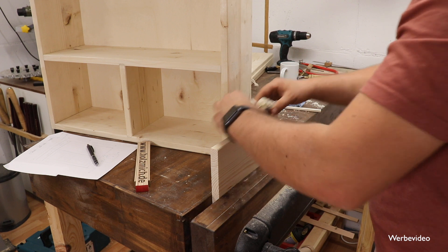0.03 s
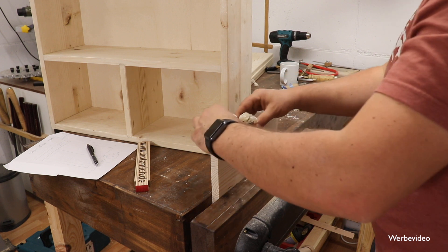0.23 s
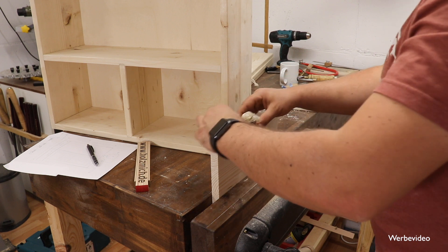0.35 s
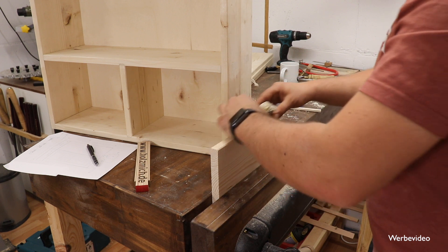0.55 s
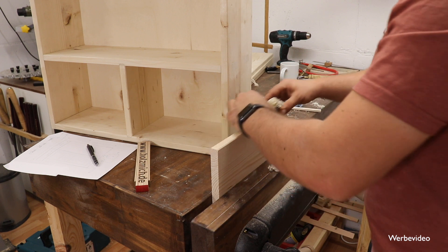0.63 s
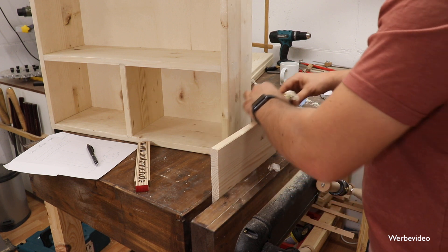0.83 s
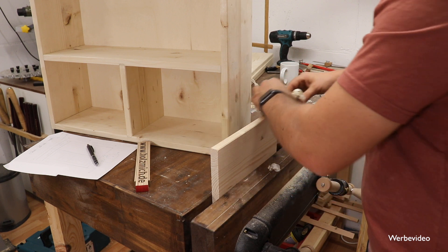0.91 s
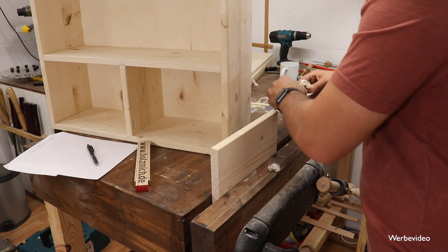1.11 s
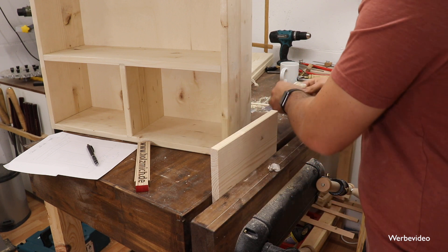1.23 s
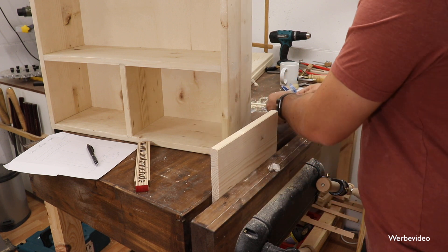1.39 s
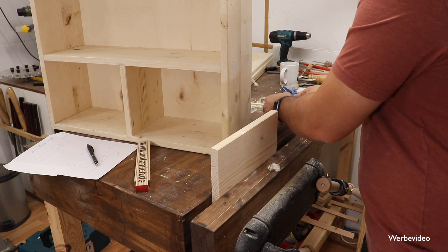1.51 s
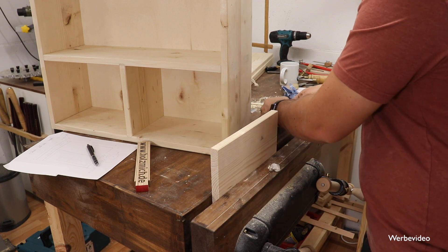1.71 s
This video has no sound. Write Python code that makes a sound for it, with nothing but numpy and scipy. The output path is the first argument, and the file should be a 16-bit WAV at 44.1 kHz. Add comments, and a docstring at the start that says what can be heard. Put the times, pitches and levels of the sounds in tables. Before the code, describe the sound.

A hand plane knocks onto a pine board and rasps off one long shaving in a workshop

```python
"""Hand plane on a pine board

Place: a small, quiet workshop, one microphone close to the board clamped to the bench. The plane slides back,
knocks down and chatters, takes one long shaving and lifts off, then touches down again with a few ticks.
Torn-fibre noise is coloured by board and blade; soft blows ring the board's modes; slides are shaped noise;
ticks and thuds are short sines. A decaying noise tail is the room, and steady noise the air.
"""
import sys
import numpy as np
from scipy import signal
from scipy.fft import rfft, irfft, next_fast_len
from scipy.io import wavfile
from scipy.ndimage import map_coordinates

SR = 44100
rng = np.random.default_rng(int(sys.argv[2]) if len(sys.argv) > 2 else 0)


def int16_out(signal):
    """Quantize to a 16-bit WAV file."""
    q = np.round(np.clip(np.atleast_2d(signal).T, -1, 1) * 32767)
    wavfile.write(sys.argv[1], SR, q.astype(np.int16))


N = 77175  # 1.75 s


def amp(db):
    """Amplitude factor of a level in dB."""
    return 10 ** (np.asarray(db) / 20)


def unit(x):
    """x scaled to an RMS of one."""
    return x / np.sqrt(np.mean(x ** 2) + 1e-20)


def along(points, hz):
    """Values at hz, read between (pitch_hz, value) points on a log frequency axis."""
    point_hz, value = np.transpose(points)
    return np.interp(np.log(hz + 1), np.log(point_hz + 1), value)


def filtered(x, response):
    """x multiplied in the spectrum by a complex response of frequency."""
    size = next_fast_len(N + SR // 2)
    spectrum = rfft(x, size) * response(np.fft.rfftfreq(size, 1 / SR))
    return irfft(spectrum, size)[..., :N]


def wobble(rate):
    """A smooth random curve with `rate` random knots a second."""
    knots = rng.standard_normal(int(N * rate / SR) + 4)
    return map_coordinates(knots, [np.arange(N) * rate / SR])


def band(f, lo_hz, hi_hz, order=6):
    """A soft-edged pass band."""
    low_edge = 1 + (lo_hz / (f + 1)) ** (2 * order)
    high_edge = 1 + (f / hi_hz) ** (2 * order)
    return 1 / np.sqrt(low_edge * high_edge)


def gains(rows):
    """Per-sample gains from rows of (start_s, level_db, ..), silent outside them."""
    s, *columns = np.transpose(rows)
    t = np.arange(N) / SR
    on = np.clip(np.minimum(t - s[0], s[-1] - t) / 0.022, 0, 1)  # 22 ms fades
    return [on * amp(np.interp(t, s, levels_db)) for levels_db in columns]


# the cut as the board sounds it, low bands to high:
# start_s, body_db, hum_db, lower_rasp_db, rasp_db, upper_rasp_db
CUT_LEVELS = [(0.33, -37, -51, -51.5, -80, -60), (0.42, -50.5, -43.5, -41, -47.5, -44),
              (0.496, -42.5, -43.5, -37.5, -64, -44.5), (0.586, -46, -44.5, -42.5, -41, -42),
              (0.608, -35, -55.5, -35, -41.5, -40), (0.632, -58, -39, -38, -48, -46),
              (0.66, -38.5, -44, -36, -49, -38), (0.698, -42, -37, -36.5, -38.5, -42),
              (0.724, -43, -48, -40, -35.5, -36.5), (0.79, -75, -28.5, -34.5, -29.5, -44.5),
              (0.806, -56, -31, -42, -29.5, -40), (0.826, -36, -54, -41, -43, -49),
              (0.846, -36.5, -45, -49, -41, -39), (0.876, -51, -43.5, -51, -37, -38),
              (0.902, -50, -41.5, -46.5, -37.5, -36.5), (0.934, -45, -40.5, -46, -36, -36.5),
              (0.96, -45.5, -38, -48, -35.5, -38), (1.012, -56, -46, -61, -41, -50.5),
              (1.044, -44.5, -49.5, -36.5, -55, -40), (1.072, -49.5, -55, -53, -64, -65),
              (1.108, -57, -62, -50.5, -77, -62), (1.16, -64, -67, -61, -70, -73)]
# the shaving's hiss: start_s, lower_treble_db, treble_db, top_db
SHAVING_LEVELS = [(.34, -66, -75, -78), (.41, -50, -58, -67), (.435, -49, -52, -59), (.47, -47, -53, -61),
                  (.61, -43, -49, -56), (.67, -40, -49, -54), (.73, -39, -48, -51), (.795, -40, -45, -48),
                  (.806, -39, -41, -45), (.82, -44, -49, -56), (.87, -47, -54, -63), (.945, -43, -53, -61),
                  (1.01, -50, -63, -70), (1.045, -50, -60, -65), (1.065, -57, -66, -74),
                  (1.13, -64, -74, -80)]
BODY_TOP_HZ, HUM_TOP_HZ, SPLIT_HZ, RASP_TOP_HZ = 463, 958, 1750, 1890
TREBLE_HZ, TOP_SPLIT_HZ = 6600, 10140
UNEVEN_DB = .6  # typical swing of the rub


def cut():
    """The blade's bites shake the board and hiss off with the shaving."""
    rub = friction() * amp(UNEVEN_DB * wobble(23.55))
    parts = [  # colour, low edge, high edge: one for each level column
        (board, 170, BODY_TOP_HZ),
        (board, BODY_TOP_HZ, HUM_TOP_HZ),
        (board, HUM_TOP_HZ, SPLIT_HZ),
        (board, SPLIT_HZ, RASP_TOP_HZ),
        (rasp, RASP_TOP_HZ, 2900),
        (rasp, 2900, TREBLE_HZ),
        (hiss, TREBLE_HZ, TOP_SPLIT_HZ),
        (hiss, TOP_SPLIT_HZ, 20000)]
    total = np.zeros(N)
    for gain, (colour, lo, hi) in zip(gains(CUT_LEVELS) + gains(SHAVING_LEVELS), parts):
        total += gain * unit(filtered(rub, lambda f: colour(f) * band(f, lo, hi)))
    return total


BITES_PER_S, BITE_SPREAD_DB = 5000, 2
SMOOTH_SHARE = .7  # share of the power in the smooth rub


def friction():
    """Fibres tearing at random moments over a smooth rub."""
    torn = rng.random(N) < BITES_PER_S / SR
    bites = torn * rng.standard_normal(N) * amp(BITE_SPREAD_DB * rng.standard_normal(N))
    smooth = rng.standard_normal(N)
    return np.sqrt(SMOOTH_SHARE) * smooth + np.sqrt(1 - SMOOTH_SHARE) * unit(bites)


# what the board rings with: pitch_hz, width_hz, level_db (relative)
BOARD_MODES = [(64.3, 6.8, -49), (147.3, 24.5, -3.5), (265.2, 28.8, 0), (334, 46, -3), (401.5, 43, -3),
               (507, 48, -5.5), (581, 72, -3.5), (674.5, 91, 0.5), (768.6, 42.6, 1), (834, 50, -3.5),
               (1166, 205, -11), (1325, 34.4, -5), (1405, 35, -8.5), (1525, 137, -9.5), (1712, 150, -17),
               (2182, 250, -13)]


def board(f):
    """The board's resonant modes, summed with alternating sign."""
    total = 0
    for k, (centre, width, db) in enumerate(BOARD_MODES):
        mode = 1j * f * width / (centre * centre - f * f + 1j * f * width)
        total = total + (-1) ** k * amp(db) * mode
    return total


# the plane's own resonances: pitch_hz, width_hz, lift_db (negative is a dip)
PLANE_MODES = [(2178, 140, 4.5), (3176, 90, 5.5), (3850, 99, 2.5), (4110, 130, 3), (4400, 150, 2),
               (5150, 78, 6), (7320, 86, 5), (8000, 100, -8), (8360, 120, 3.5)]


def plane(f):
    """The plane's resonances lift or dip the colour around their pitches."""
    return amp(sum(db / (1 + (2 * (f - centre) / width) ** 2) for centre, width, db in PLANE_MODES))


# blade and plane body above the board's modes: pitch_hz, level_db (relative)
RASP_COLOUR = [(1000, -11), (1700, -4), (1950, 1), (2170, 4), (2730, -7), (3200, -9), (3650, -11.5),
               (5020, -10.5), (6680, -17.5), (7000, -17), (9100, -63), (15400, -120)]


def rasp(f):
    """Colour of blade and plane body, with the plane's resonances."""
    return amp(along(RASP_COLOUR, f)) * plane(f)


# the shaving's treble: pitch_hz, level_db (relative)
HISS_COLOUR = [(3530, -10), (6000, -3.5), (6710, -11), (7780, 1), (8700, -2.5), (10100, -10.5),
               (12700, -4.5), (14100, -7), (15600, -8.5)]


def hiss(f):
    """Colour of the shaving's hiss, with the plane's resonances."""
    return amp(along(HISS_COLOUR, f)) * plane(f)


# the sole knocks on the board: start_s, level_db (before the two offsets below), softness_hz (cut-off)
KNOCK_BLOWS = [(.210, -16, 1860), (.214, -12.5, 985), (0.22, -32, 694), (.226, -16, 880), (.234, -17, 880),
               (.239, -17, 695), (0.248, -15.5, 800), (.267, -19, 690), (0.286, -21, 890),
               (.293, -22.5, 880), (.298, -27, 700), (.765, -27.5, 1000), (0.808, -24, 600)]
KNOCK_DB, CRACK_DB = 12, -22.5  # added to each blow's level, for its push and its crack
CRACK_S = 0.036  # time for the crack to fall 60 dB


def knocks():
    """Soft blows ring the board, each with a faint woody crack."""
    push, crack = np.zeros(N), np.zeros(N)
    t = np.arange(SR // 20) / SR
    for s, db, hz in KNOCK_BLOWS:
        start = round(s * SR)
        u = 2 * np.pi * hz * t
        push[start:][:len(t)] += amp(db + KNOCK_DB) * u * np.exp(1 - u)
        fall = amp(db + CRACK_DB - 60 * t / CRACK_S)
        crack[start:][:len(t)] += fall * rng.standard_normal(len(t))
    return filtered(push, board) + filtered(crack, lambda f: band(f, 810, 4100, order=2))


# the sole slides without cutting: start_s, end_s, level_db
SLIDE_SPANS = [(-.05, 0.213, -48.5), (.215, 0.325, -56), (1.042, 1.438, -59), (1.657, 1.8, -50.5)]
# their colours, in order: back, just after landing, faint rub after the stroke, touching down again
# pitch_hz, level_db (relative)
BACK_COLOUR = [(71, -49), (120, -11), (230, -17), (286, -3), (417, -12.5), (680, 4), (785, -12), (908, -1),
               (1480, -13.5), (1680, -8), (2080, -22.5), (4210, -19), (9000, -73), (11700, -70),
               (19800, -120)]
SCUFF_COLOUR = [(1000, -21), (2200, 2), (3000, 3), (5500, -5), (9000, -16), (14000, -24)]
RUSTLE_COLOUR = [(180, -36), (300, 5), (639, -14), (701, -3), (1050, -3.5), (1260, 0.5), (2490, -7.5),
                 (12000, -17.5), (15600, -48), (22000, -120)]
TOUCH_COLOUR = [(350, -30), (600, -2), (751, -27), (834, -9), (1430, -3.5), (1740, -5.5), (3750, -9.5),
                (4060, -9), (14000, -21.5)]
SLIDE_EDGE_S = 0.005


def slides():
    """The sole rubs lightly along the edge: friction noise with an uneven level."""
    t = np.arange(N) / SR
    total = np.zeros(N)
    colours = (BACK_COLOUR, SCUFF_COLOUR, RUSTLE_COLOUR, TOUCH_COLOUR)
    for (start, end, db), colour in zip(SLIDE_SPANS, colours):
        rub = unit(filtered(friction(), lambda f: amp(along(colour, f))))
        fade = np.clip(np.minimum(t - start, end - t) / SLIDE_EDGE_S, 0, 1)
        total += fade * amp(db + wobble(30.83)) * rub
    return total


# the plane is set down: start_s, level_db (of the sine at its start), pitch_hz
TICK_CONTACTS = [(1.6608, -35, 1900), (1.666, -43, 8240), (1.6768, -35, 2200), (1.6832, -34, 1300)]
TICK_S, TICK_NOISE = .006, .3  # time to fall 60 dB; noise beside the sine


def ticks():
    """Tiny contacts as the plane is set down: fast-dying sines with some noise."""
    total, t = np.zeros(N), np.arange(SR // 50) / SR
    for s, db, hz in TICK_CONTACTS:
        ring = np.sin(2 * np.pi * hz * t) + TICK_NOISE * rng.standard_normal(len(t))
        total[round(s * SR):][:len(t)] += amp(db - 60 * t / TICK_S) * ring
    return total


# bench and board swing softly under the hands' weight: start_s, level_db (envelope peak), pitch_hz, rise_s
THUD_SWINGS = [(.23, -52, 67, .025), (.36, -53.5, 66.5, 0.034), (0.482, -62, 68, 0.026),
               (.69, -54, 69, 0.015), (.815, -52, 71, .015), (.815, -39.5, 154, 0.016),
               (.826, -32, 243.4, .011), (.89, -34.5, 243, 0.0056)]


def thuds():
    """Soft low swings that swell and die."""
    total, t = np.zeros(N), np.arange(SR // 4) / SR
    for s, db, hz, rise in THUD_SWINGS:
        swell = t / rise * np.exp(1 - t / rise)
        total[round(s * SR):][:len(t)] += amp(db) * swell * np.sin(2 * np.pi * hz * t)
    return total


# how long the small room rings: pitch_hz, t60_s
ROOM_DECAY = [(150, 0.37), (1000, 0.35), (4000, 0.34), (12000, 0.04)]
ROOM_DB = -11.5


def room(x):
    """Each frequency of the room's answer dies at its own speed; a new tail for each quarter second."""
    out, step = np.zeros(N), SR // 4
    for a in range(0, N, step):
        hz, t, z = signal.stft(rng.standard_normal(SR // 2), SR, nperseg=256)
        decay = amp(-60 * t / along(ROOM_DECAY, hz)[:, None])
        tail = signal.istft(z * decay, SR, nperseg=256)[1]
        late_tail = np.pad(tail, (300, 0))  # the answer starts about 7 ms late
        wet = signal.fftconvolve(x[a:a + step], late_tail / np.linalg.norm(tail))
        out[a:a + len(wet)] += wet[:N - a]
    return out


# the quiet workshop: pitch_hz, level_db (relative)
AIR_COLOUR = [(15, -47), (25, -17), (122, -2.5), (169, -6.5), (282, -10.5), (314, -6), (390, -10),
              (584, -6.5), (829, -10.5), (1080, -4), (1240, -11.5), (1500, -13), (15600, -24.5)]
AIR_DB = -54


def air():
    """The workshop's steady background: coloured noise at one level."""
    noise = filtered(rng.standard_normal(N), lambda f: amp(along(AIR_COLOUR, f)))
    return amp(AIR_DB) * unit(noise)


def scene():
    """The plane close by, the room's answer under it, and the air, in one channel."""
    near = cut() + knocks() + slides() + ticks() + thuds()
    return (near + amp(ROOM_DB) * room(near) + air())[None]


TOP_HZ = 15720


def record(dry):
    """Nothing is kept above the band limit."""
    return filtered(dry, lambda hz: hz < TOP_HZ)


dry = scene()
out = record(dry)
int16_out(out)
```